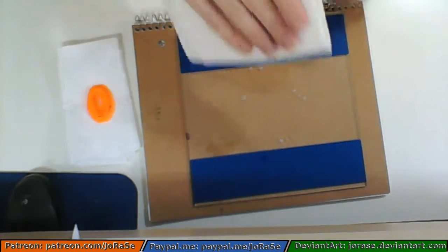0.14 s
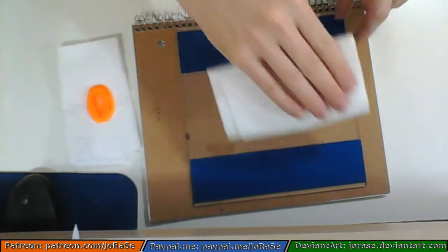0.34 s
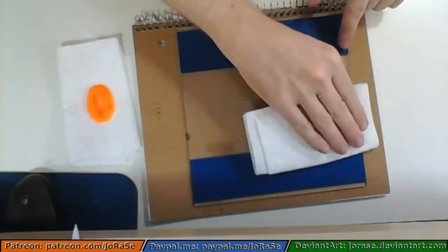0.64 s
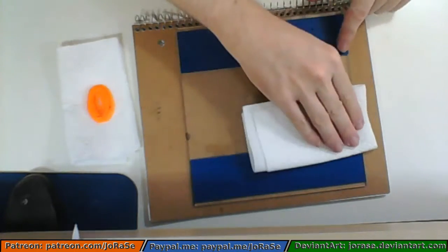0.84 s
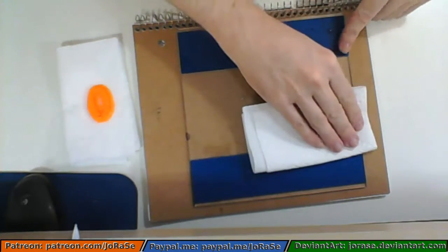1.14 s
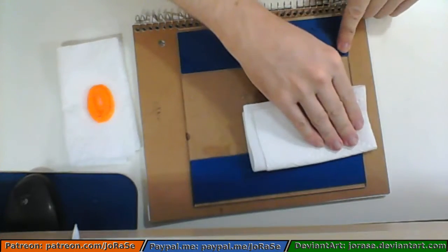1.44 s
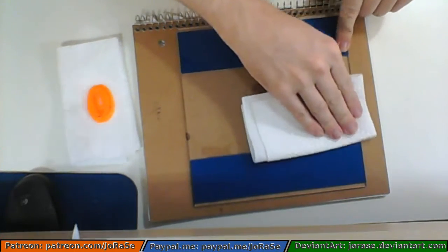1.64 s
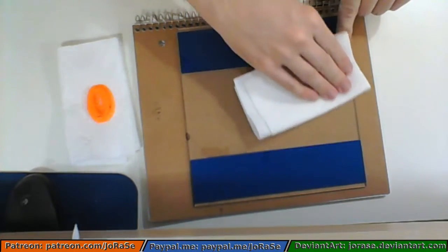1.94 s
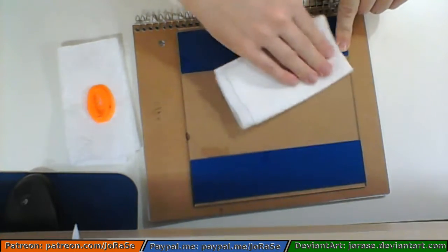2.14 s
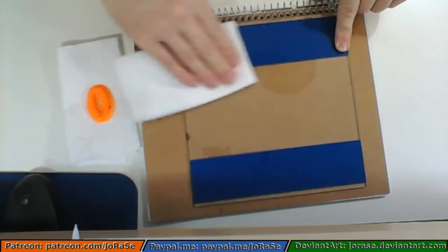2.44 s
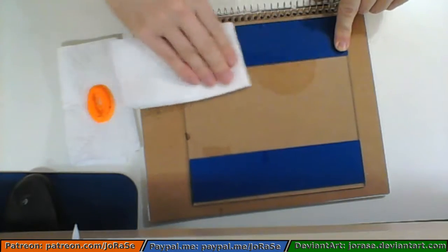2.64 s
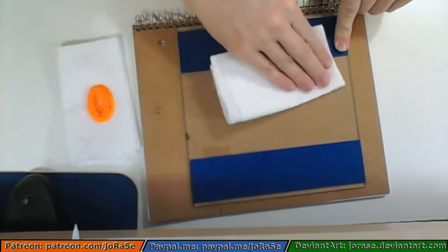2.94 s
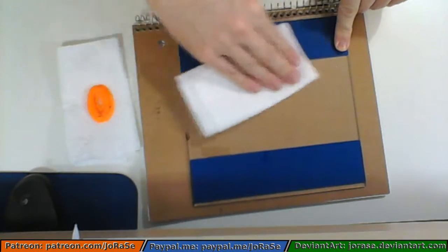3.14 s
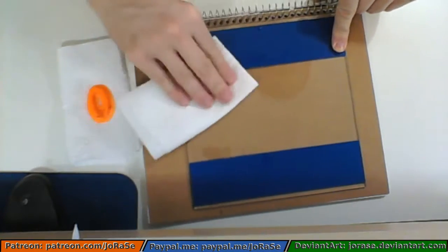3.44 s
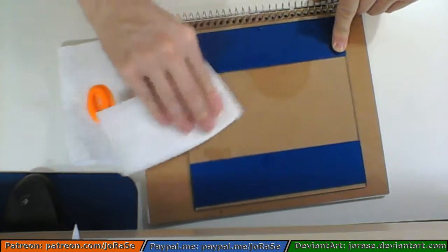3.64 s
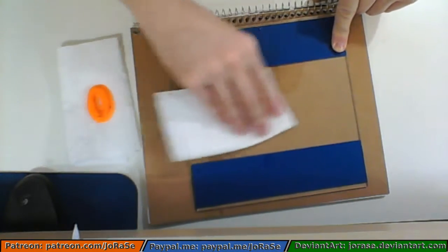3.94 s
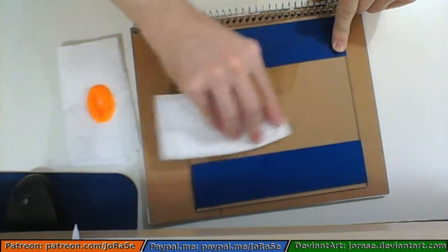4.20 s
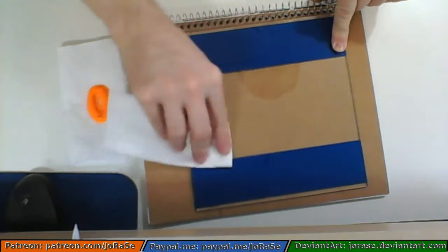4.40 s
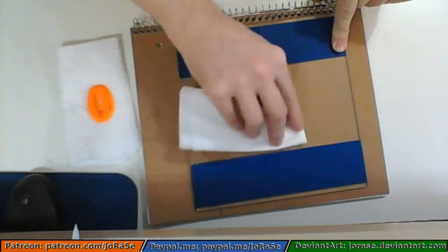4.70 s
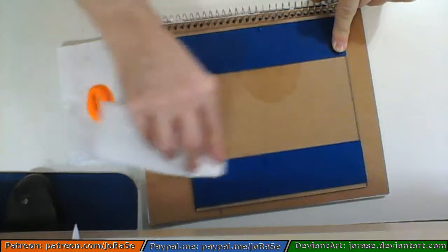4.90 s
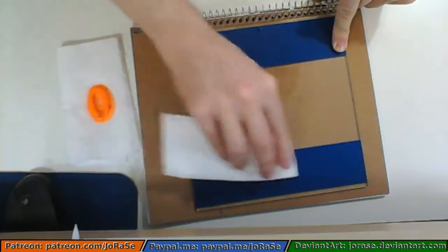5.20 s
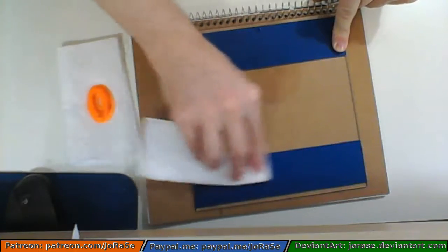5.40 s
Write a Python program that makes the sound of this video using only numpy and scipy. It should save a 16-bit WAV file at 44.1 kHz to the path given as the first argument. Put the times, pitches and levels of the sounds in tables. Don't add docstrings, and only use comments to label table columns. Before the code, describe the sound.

In a small room with a quiet fan hum, a folded paper towel rubs a glass plate at arm's length from a camera microphone clamped to the table. Faint dabs come first, then a near pause with low bumps, then stronger hissing strokes with dull hollow plate tones. The sound is thin and watery from noise reduction, its treble dropping out at times.

```python
import sys
import numpy as np
from scipy import signal
from scipy.fft import rfft, irfft, dct, next_fast_len
from scipy.io import wavfile
from scipy.ndimage import uniform_filter1d, minimum_filter1d

SR = 44100
rng = np.random.default_rng(int(sys.argv[2]) if len(sys.argv) > 2 else 0)


def level_to_linear(level):
    exponent = np.asarray(level, float) / 20
    return 10 ** exponent


def transcribe(u):
    v = np.clip(np.atleast_2d(u).T, -1, 1)
    q = np.round(v * 32767).astype(np.int16)
    wavfile.write(sys.argv[1], SR, q)


N = 245195

# centre in Hz, width in Hz, lift in dB.
GLASS_MODES = [(990.3, 6.6, 22.5), (1157.5, 33, 9), (1249, 71, 4), (1350.4, 18, 9), (1514, 72, 8),
               (1940, 140, 5.5), (2163, 3.3, 21), (2552, 380, 6.5), (2932, 12, 5.5), (3104, 14, 9),
               (3487, 21, 4.5), (4255, 60, 7.5), (4815, 28, 4), (6100, 45, 4), (7060, 99, 6.5)]
REMOVED_DB = 14.5


def evened(x):
    return x / np.sqrt(np.mean(x ** 2) + 1e-20)


def coloured(points, extra_db_per_octave=0, modes=()):
    size = next_fast_len(N, True)
    hz = np.fft.rfftfreq(size, 1 / SR) + .1
    point_hz, point_db = np.transpose(points)
    shape_db = np.interp(np.log(hz), np.log(point_hz), point_db)
    shape_db = shape_db + extra_db_per_octave * np.log2(hz / 7000)
    for centre, width, lift in modes:
        shape_db = shape_db + lift / (1 + (2 * (hz - centre) / width) ** 2)
    return evened(irfft(rfft(rng.standard_normal(size)) * level_to_linear(shape_db), size)[:N])


def wander(hz):
    low_pass = signal.butter(2, hz, fs=SR / 128, output="sos")
    coarse = evened(signal.sosfiltfilt(low_pass, rng.standard_normal(N // 128 + 2)))
    return np.interp(np.arange(N) / 128, np.arange(len(coarse)), coarse)


def ramps_db(rows, rise_db_per_s, fall_db_per_s):
    t = np.arange(0, N, 16) / SR
    start, held, db = np.array(rows).T[:3, :, None]
    early = np.maximum(start - t, 0)
    late = np.maximum(t - start - held, 0)
    level_db = db - rise_db_per_s * early - fall_db_per_s * late
    return np.repeat(level_db, 16, axis=1)[:, :N]


def resonate(x, hz, width_hz):
    turn = np.exp(2j * np.pi * np.cumsum(hz) / SR)
    r = np.exp(-np.pi * width_hz / SR)
    return (turn * signal.lfilter([1], np.convolve([1, -r], [1, -r]), x / turn)).real


def room(waver_db=0.5, drift_hz=0.45):
    # frequency in Hz, level in dB per Hz.
    air_colour = [(30, -14), (74, -7), (110, -4), (150, -13), (215, -4), (290, -10), (320, -13), (380, -7),
                  (430, -15), (520, -27.5), (700, -43.5)]
    # frequency in Hz, level in dB per Hz.
    room_colour = [(280, -29.5), (480, 1.5), (524, -8.5), (606, -1.5), (690, -5.5), (1200, -5.5),
                   (1500, -8.5), (1750, -15), (2500, -20.5), (4000, -23.5), (7000, -26.5), (10000, -42),
                   (14000, -40), (15900, -51)]
    # frequency in Hz, rms level in dB.
    hum_lines = [(74.1, -68.5), (119.4, -60.5), (124.6, -69.5), (130.4, -68), (250, -66), (261, -70),
                 (264.9, -65), (376, -83), (394, -83.5), (654, -82.5)]
    whine = (8000, -97)  # Hz, dB rms
    t = np.arange(N) / SR
    out = level_to_linear(-61.5) * coloured(air_colour) + level_to_linear(-69) * coloured(room_colour)
    for hz, db in hum_lines + [whine]:
        turns = hz * t + drift_hz * np.cumsum(wander(3.05)) / SR + rng.random()
        out += np.sqrt(2) * level_to_linear(db + waver_db * wander(4.3)) * np.sin(2 * np.pi * turns)
    return out * level_to_linear(REMOVED_DB)


def patchy(x, patch_db):
    z = signal.stft(x, nperseg=512)[2]
    patches = uniform_filter1d(rng.standard_normal(z.shape), size=4, axis=0)
    patches = uniform_filter1d(patches, size=16, axis=1)
    return signal.istft(z * level_to_linear(patch_db * evened(patches)), nperseg=512)[1][:N]


def fibres(knee_db=-60, grain_db=0.13):
    # full pressure from in seconds, held in seconds, fibre hiss in dB,
    # dull part against the hiss in dB.
    strokes = [(.05, .012, -75, -15), (.2, 0.01, -77, -12), (.414, 0.016, -82, -2), (0.656, .02, -74, 15.5),
               (.875, 0.033, -72.5, 9), (1.572, 0.084, -64, 7), (1.66, 0.064, -65.5, 8.5),
               (1.79, 0.088, -76, -12), (1.95, .04, -73.5, -11), (2.01, 0.081, -62.5, 3.5),
               (2.085, 0.1, -60, 9.5), (2.16, 0.23, -56.5, 5.5), (2.34, 0.12, -54, 3.5),
               (2.44, 0.079, -56.5, 8), (2.678, .2, -57, 6.5), (2.976, 0.0028, -58, 6.5),
               (3.06, 0.071, -66.5, 6.5), (3.188, 0.13, -59.5, 3.5), (3.339, 0.041, -55, 9),
               (3.473, 0.043, -61, -8), (3.743, 0.026, -62, 5), (3.868, 0.091, -66, -2),
               (4.113, 0.0083, -58, 9.5), (4.37, 0.027, -60, 1), (4.53, 0.034, -64.5, 7.5),
               (4.58, 0.031, -60, 4), (4.795, 0.0049, -73.5, 12.5), (4.877, 0.12, -55, 2.5),
               (5.04, 0.014, -66.5, 8), (5.407, 0.14, -54, 2.5)]
    # frequency in Hz, level in dB per Hz.
    hiss_colour = [(2100, -15.5), (3600, -12), (3850, -1), (4270, -0.5), (4950, 2.5), (5490, -3), (5980, 1),
                   (7220, -1), (8700, -2), (9400, -15.5)]
    # frequency in Hz, level in dB per Hz.
    airy_colour = [(8300, -20.5), (9000, -1.5), (11000, -4), (13100, -2.5), (14300, -12), (15700, -7.5)]
    # frequency in Hz, level in dB per Hz.
    dull_colour = [(1500, -68), (1750, -0.5), (2300, -7.5), (2900, -2), (3400, 0.5), (3700, -23.5)]
    air_share_db, air_per_db = -4, -0.12
    each_db = ramps_db(strokes, rise_db_per_s=563, fall_db_per_s=311)
    hiss_db = np.maximum(each_db.max(axis=0), -108.5)
    dull_db = uniform_filter1d(np.array(strokes)[each_db.argmax(axis=0), -1], size=1000)
    lift_db = .5 * np.maximum(knee_db - hiss_db, 0)
    hiss = coloured(hiss_colour, 0, GLASS_MODES)
    hiss = hiss + level_to_linear(air_share_db - air_per_db * lift_db) * coloured(airy_colour)
    hiss += level_to_linear(-15.5 + dull_db) * coloured(dull_colour, 0, GLASS_MODES)
    hiss = patchy(hiss, patch_db=.9)
    return hiss * level_to_linear(hiss_db + lift_db + 1.0 + grain_db * wander(44))


def sway(drift=0.1328, loose_db=-9):
    # full from in seconds, held in seconds, sway in dB.
    pushes = [(.11, .4, -61), (.95, .04, -46), (1.03, 0.046, -30), (1.24, 0.013, -30), (1.46, 0.02, -30),
              (1.71, 0.007, -31.5), (1.87, .01, -39.5), (2.25, 0.25, -41), (2.49, 0.025, -32.5),
              (2.63, 0.0069, -40.5), (2.81, 0.011, -40), (2.91, .01, -42), (3.1, 0.1, -34.5),
              (3.22, 0.023, -27.5), (3.3, 0.23, -32), (3.56, .28, -33), (3.92, 0.013, -26.5),
              (4.02, 0.12, -33), (4.3, 0.13, -39.5), (4.57, 0.029, -32), (4.77, 0.13, -34),
              (5.02, 0.15, -39), (5.39, 0.014, -28.5), (5.54, .02, -40.5)]
    # frequency in Hz, level in dB per Hz.
    loose_colour = [(2, 4.5), (6.2, -1), (16, 4.5), (33, -23.5), (50, -40), (90, -63)]
    # frequency in Hz, level in dB.
    arm_modes = [(6.1, 2), (11.5, -9), (16.5, -5.5), (24, -24), (32, -15)]
    out = level_to_linear(loose_db) * coloured(loose_colour)
    for hz, db in arm_modes:
        turns = np.cumsum(hz * (1 + drift * wander(2.9))) / SR + rng.random()
        out += level_to_linear(db) * np.sin(2 * np.pi * turns)
    push_db = ramps_db(pushes, rise_db_per_s=246, fall_db_per_s=181).max(axis=0)
    push_db = np.maximum(push_db, -72)
    return level_to_linear(uniform_filter1d(push_db, size=1500)) * evened(out)


def catches():
    # centre in seconds, length in seconds, frequency in Hz, width in Hz, level in dB.
    creases = [(.675, 0.11, 4820, 500, -66.5), (0.88, 0.058, 6500, 600, -71.5),
               (1.646, 0.28, 4570, 1600, -71.5), (1.702, 0.12, 3090, 90, -76),
               (1.725, 0.11, 2490, 90, -73.5), (0.667, 0.065, 6260, 500, -68.5),
               (0.676, 0.055, 1550, 700, -62), (2.18, 0.2, 1516, 90, -68), (1.832, .12, 12650, 1510, -69),
               (2.052, 0.108, 1940, 70.5, -68.5), (3.207, 0.059, 4600, 600, -67),
               (3.454, 0.082, 1335, 70, -65), (3.51, 0.039, 2596, 89.9, -69), (3.854, 0.09, 4310, 152, -69),
               (4.131, 0.11, 4370, 80.4, -72), (4.38, 0.073, 4220, 300, -68), (4.387, 0.1, 6100, 300, -73),
               (4.385, 0.062, 2483, 69, -71), (4.803, 0.074, 4670, 500, -67)]
    out, slips = np.zeros(N), rng.standard_normal(N)
    for s, length, hz, width_hz, db in creases:
        a, b = round((s - length / 2) * SR), round((s + length / 2) * SR)
        band = evened(resonate(slips[a:b], np.full(b - a, hz), width_hz))
        out[a:b] += level_to_linear(db) * band * signal.windows.tukey(b - a, .6)
    return out


def plate(width_hz=230, lift_db=3.5, ring_share=0.53):
    # full from in seconds, held in seconds, level in dB, centre in Hz.
    answers = [(.67, 0.017, -63, 1260), (2.017, 0.015, -63, 1394), (2.097, 0.1, -59.5, 1348),
               (2.17, 0.093, -62.5, 1492), (2.27, 0.048, -69.5, 1444), (2.365, .03, -64, 1450),
               (2.42, 0.047, -64, 1330), (2.95, 0.018, -71, 925), (3.05, 0.062, -65.5, 1532),
               (3.3, 0.028, -61, 1140), (3.335, 0.033, -56.5, 1289), (3.44, 0.047, -62.5, 1332),
               (3.735, 0.06, -64.5, 1190), (4.02, 0.11, -70.5, 1172), (4.096, 0.032, -57.5, 1280),
               (4.573, 0.026, -59, 1210), (4.87, 0.053, -58.5, 1157), (5.015, .008, -61, 1000),
               (5.38, 0.015, -60, 1210), (5.432, 0.028, -57.5, 1297), (5.525, 0.015, -59, 1180)]
    softened_modes = [(hz, width, ring_share * db) for hz, width, db in GLASS_MODES]
    out = np.zeros(N)
    slips = coloured([(500, -1.5), (2500, -0.45)], 0, softened_modes)
    levels_db = ramps_db(answers, rise_db_per_s=301, fall_db_per_s=400)
    for (s, held, db, hz), level_db in zip(answers, levels_db):
        span = slice(round((s - .15) * SR), round((s + held + .25) * SR))
        band = evened(resonate(slips[span], np.full(len(slips[span]), hz), width_hz))
        out[span] += band * level_to_linear(level_db[span] + lift_db)
    return out


def scene():
    return (fibres() + plate() + room() + sway() + catches())[None]


def remove_noise(x, release_db=-0.5, floor_hz=45, wary_hz=850):
    margin_db = 7.5
    hz, t, z = signal.stft(x, SR, nperseg=2048, noverlap=1536, boundary="even")
    power = abs(z) ** 2 + 1e-20
    learnt = uniform_filter1d(np.median(power[:, 22:52], 1), size=9) / np.log(2)
    held = minimum_filter1d(power, size=2, axis=1)
    over_db = 10 * np.log10(held / learnt[:, None]) - margin_db
    over_db[hz < wary_hz] = -60
    over_db[hz < floor_hz] = 60
    gain_db = -REMOVED_DB / (1 + np.exp(np.clip(over_db / .7, -30, 30)))
    for step in (1, -1, 1):
        padded = np.pad(gain_db, ((0, 0), (1, 1)), "edge")
        neighbour_db = np.roll(padded, step, 1)[:, 1:-1]
        gain_db = np.maximum(gain_db, neighbour_db - abs(release_db))
    return signal.istft(z * level_to_linear(gain_db), SR, nperseg=2048, noverlap=1536)[1][:N]


def starve(x, rise_db=-0.5):
    # coarsest from in seconds, held in seconds, step in dB.
    dropouts = [(1.024, 0.02, -60.5), (1.095, 0.0042, -69.5), (1.163, 0.056, -70.5), (1.233, 0.0095, -58),
                (1.302, 0.006, -70.5), (1.39, 0.038, -57.5), (1.488, 0.0039, -61), (1.558, 0.025, -69),
                (1.744, .005, -62.5), (1.883, 0.014, -61.5), (2.488, .005, -68), (2.605, 0.023, -67.5),
                (3.044, .005, -61.5), (3.185, 0.024, -58.5), (3.485, 0.047, -59), (3.601, .005, -67),
                (3.665, 0.04, -57), (3.81, 0.033, -58), (3.95, .005, -73), (4.005, 0.032, -59),
                (4.2, .01, -52.5), (4.298, .028, -77), (4.36, 0.011, -59), (4.6, .005, -77),
                (4.646, .005, -64), (4.762, 0.0074, -59), (4.85, .033, -54.5), (5.0, 0.04, -68),
                (5.178, 0.04, -64), (5.389, .005, -55)]
    hop, grid = 1024, 177
    lead = 2 * hop - grid
    window = signal.windows.kaiser_bessel_derived(2 * hop, 4 * np.pi)
    padded = np.pad(x, (lead, 3 * hop))
    frames = np.lib.stride_tricks.sliding_window_view(padded, 2 * hop)[::hop] * window
    a, b, c, d = np.split(frames, 4, axis=1)
    lines = dct(np.hstack([-c[:, ::-1] - d, a - b[:, ::-1]]), type=4, norm="ortho")
    need_db = ramps_db(dropouts, rise_db_per_s=636, fall_db_per_s=502).max(axis=0)
    centres = np.clip(np.arange(len(lines)) * hop + hop - lead, 0, N - 1)
    step_db = np.maximum(need_db[centres], -78)
    tilt_db = rise_db * np.log2((np.arange(hop) + 1) / 200)
    step = level_to_linear(step_db[:, None] + tilt_db)
    kept = lines / (1 + (step / (abs(lines) + 1e-12)) ** 12)
    p, q = np.split(dct(kept, type=4, norm="ortho"), 2, axis=1)
    halves = np.hstack([q, -q[:, ::-1], -p[:, ::-1], -p]) * window
    return (halves[1:, :hop] + halves[:-1, hop:]).ravel()[lead - hop:][:N]


def roll_off(x):
    return signal.sosfilt(signal.butter(12, 15650, fs=SR, output="sos"), x)


def record(dry):
    cleaned = remove_noise(dry[0])
    mix = starve(cleaned)[None]
    return roll_off(mix)


dry = scene()
out = record(dry)
transcribe(out)
```